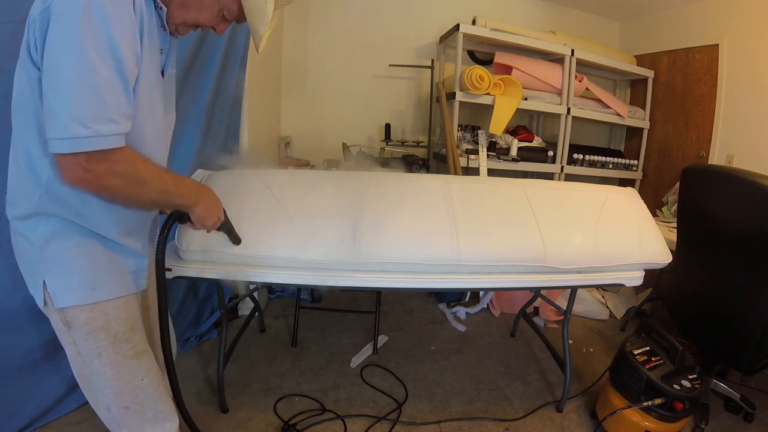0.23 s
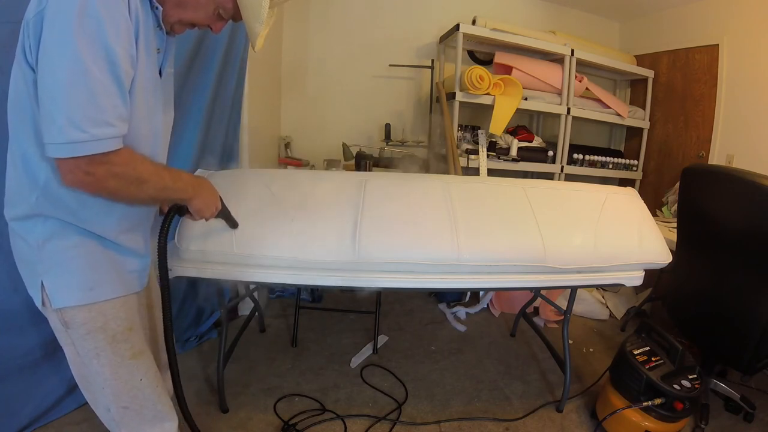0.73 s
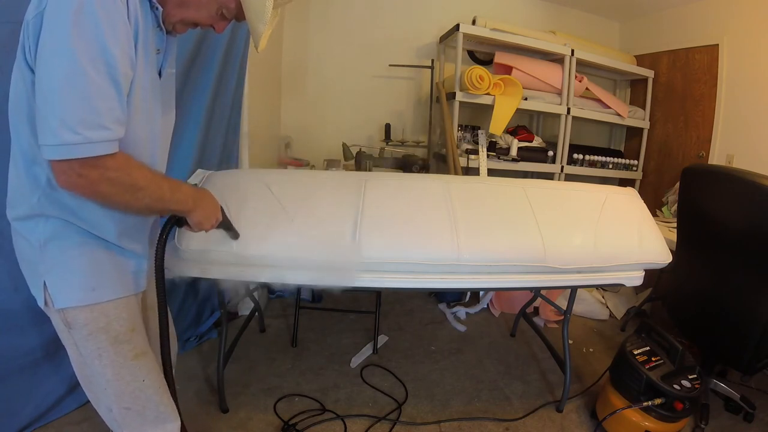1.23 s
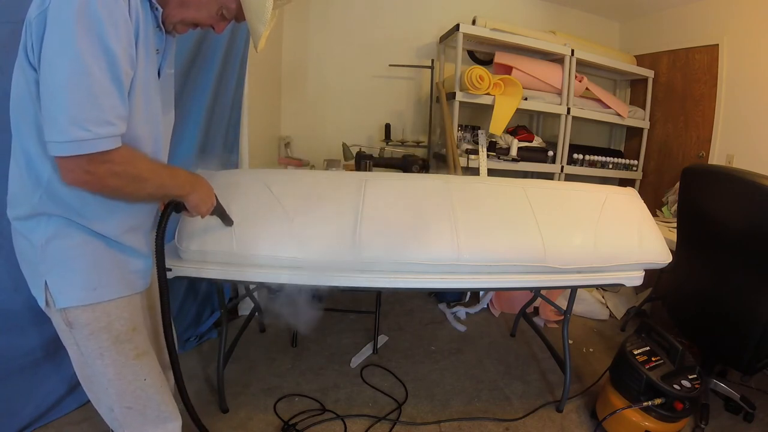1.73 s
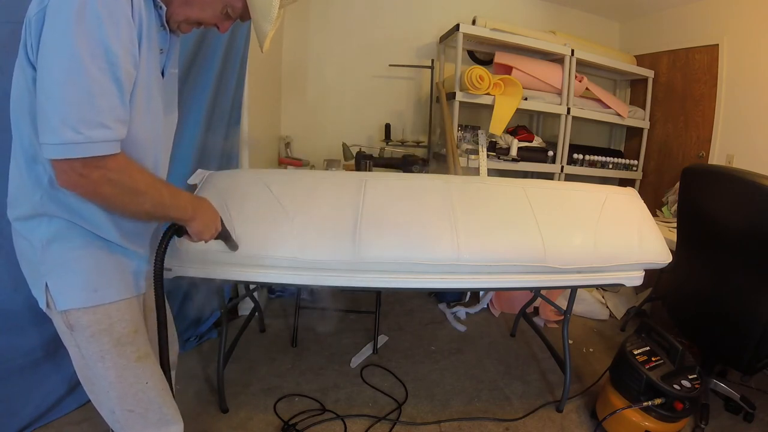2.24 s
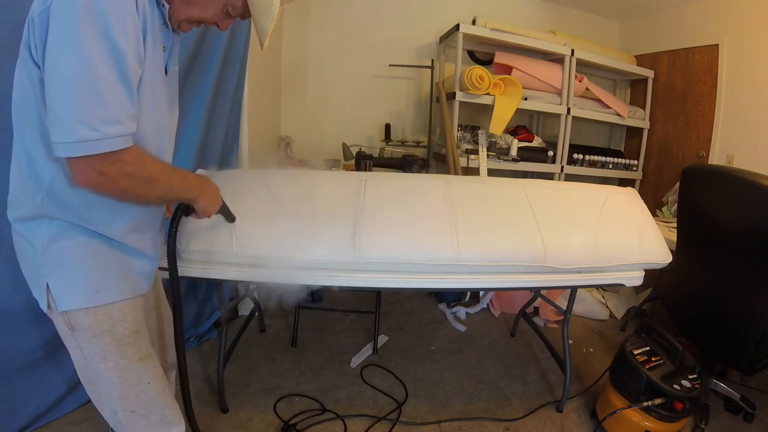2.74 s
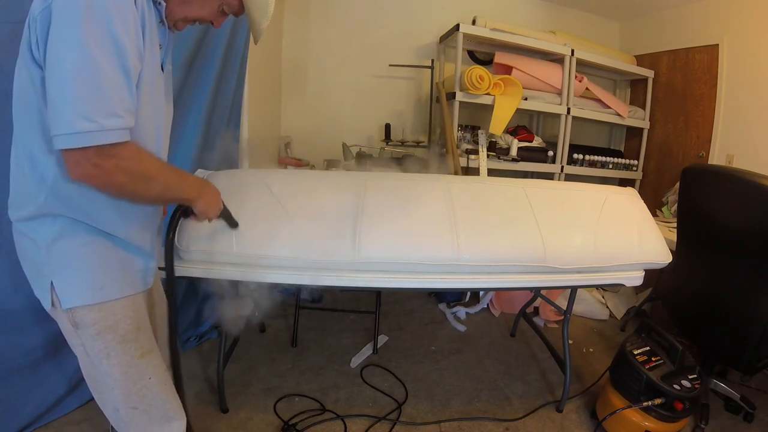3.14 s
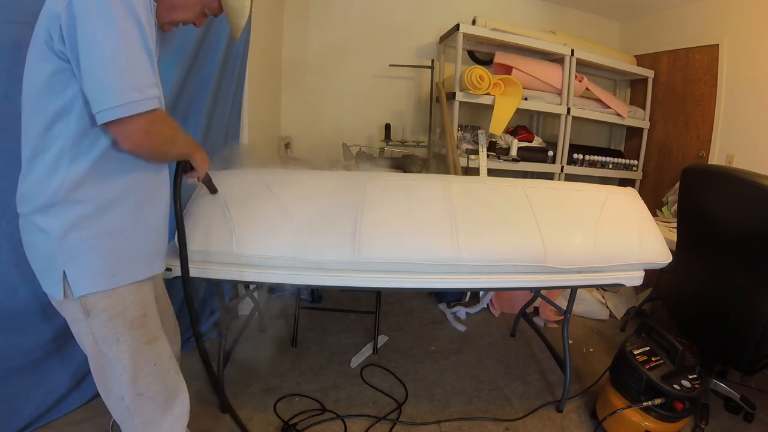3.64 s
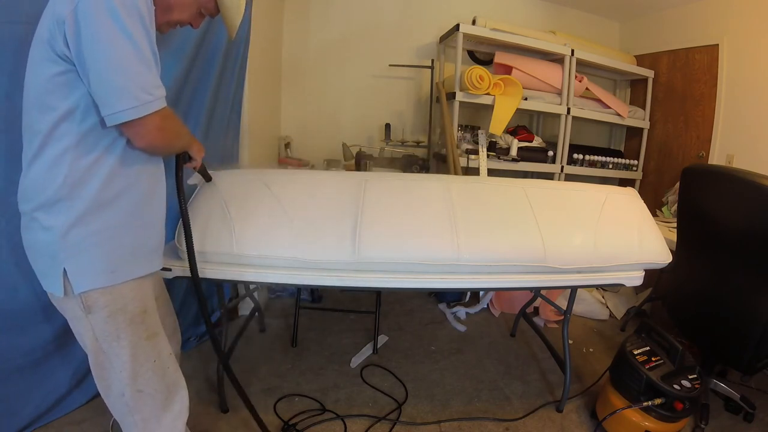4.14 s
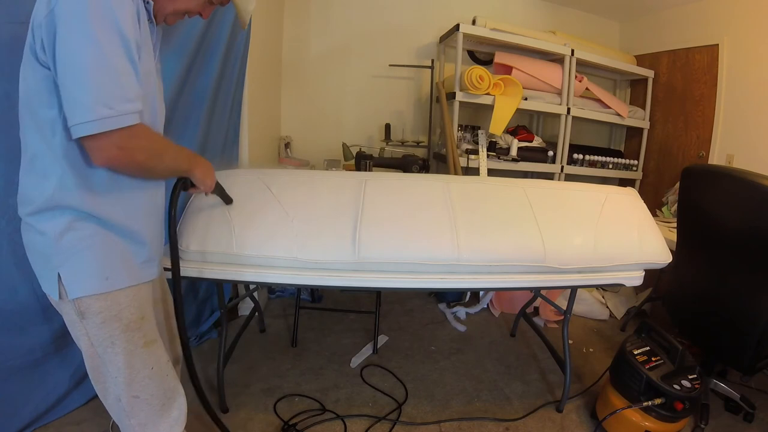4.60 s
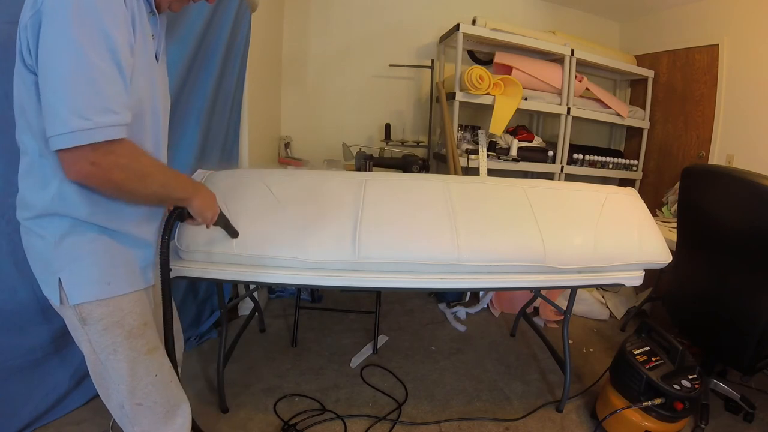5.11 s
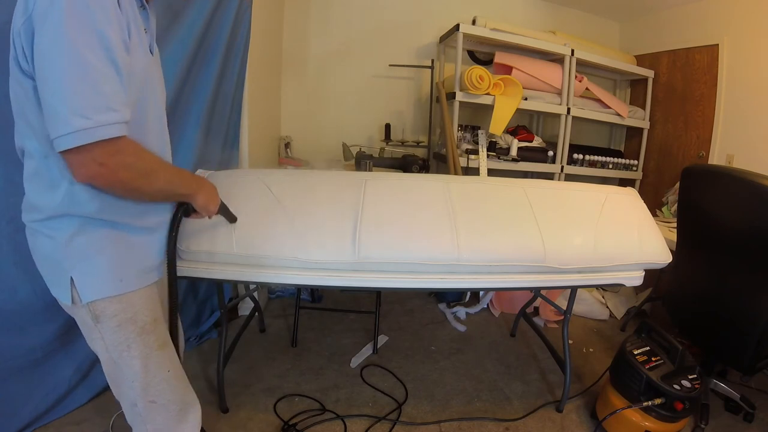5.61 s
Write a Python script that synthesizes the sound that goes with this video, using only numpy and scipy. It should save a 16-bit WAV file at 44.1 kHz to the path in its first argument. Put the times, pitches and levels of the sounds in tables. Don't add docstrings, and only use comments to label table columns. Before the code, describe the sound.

A handheld steamer runs throughout, heard from a few steps away by a camera microphone in a small workshop with close walls and a short tail. The wet hiss has a noisy, slightly whistling ring wavering around 3 kHz, dry fizz from about 4 to 9 kHz and thinner mist above. From 0 to 4 seconds it is strong and agitated: puffs and soft, hollow slaps on taut vinyl around 1 kHz come several times a second, with rushing along seams and tiny droplet spits. Condensate makes it choke briefly, notably near 0.3, 0.7, 1.0 and, deepest, 2.05 to 2.25 seconds. A misty, wet spray swells around 3.8, then the jet drops markedly near 4.15. It gradually recovers, steadier and somewhat weaker, with renewed puffs after 5 seconds and misty spray near 5.8, still hissing at the end. Low room rumble, a faint wavering motor hum near 85 Hz and slight microphone hiss remain underneath.

```python
import sys
import numpy as np
from scipy import signal
from scipy.io import wavfile
from scipy.ndimage import uniform_filter1d

SR = 44100
rng = np.random.default_rng(int(sys.argv[2]) if len(sys.argv) > 2 else 0)


def gain_from_decibels(decibels):
    exponent = np.asarray(decibels, float) / 20
    return 10 ** exponent


def transcribe(signal):
    frames = np.atleast_2d(signal).T
    limited = np.clip(frames, -1, 1)
    pcm = np.round(limited * 32767).astype(np.int16)
    wavfile.write(sys.argv[1], SR, pcm)


N = 258558

# f/Hz, density level/dB
RUMBLE_SPECTRUM = [(10, -15), (20, 7.5), (27, -3), (34, -1), (60, -5.5), (110, -11.5), (200, -12.5),
                   (400, -17), (800, -17.5), (1600, -22), (3000, -21.5)]
# f/Hz, density level/dB
CAPSULE_SPECTRUM = [(1500, -19), (4000, -4), (7300, -3), (8200, -5), (8800, -5), (12000, 6), (13400, 4),
                    (15300, 2)]
# t/s, level/dB, rise/s, fade/s
HUM_SWELLS = [(.03, 13, .05, 0.071), (.45, 13, .12, 0.079), (1.12, 11, 0.16, .08), (1.4, 4, .04, 0.036),
              (1.75, 5.5, 0.11, .05), (2.07, 12, .08, .07), (2.42, 8, .08, .04), (2.76, 12, .07, 0.12),
              (3.4, 13.5, .2, 0.17), (3.83, 11.5, .12, 0.22), (4.7, 10, 0.2, .35), (5.37, 10, .04, .04),
              (5.62, 7, .08, .3)]
# delay t/s, level/dB
WALL_ECHOES = [
    (.0009, -40),
    (.0023, -26),
    (.0041, -33.5),
    (.0078, -12.5),
    (.0095, -13.5),
]
# f/Hz, density level/dB
WASH_SPECTRUM = [(150, -7.5), (300, -6), (480, -4), (600, 0.5), (700, -3.5), (860, 1.5), (1100, -0.5),
                 (1400, -5.5), (1700, -31.5), (2200, -18)]
# f/Hz, density level/dB
RUSH_SPECTRUM = [(900, -57), (1250, -6), (1500, 0.5), (1800, 1), (2100, 1.5), (2400, 5), (2900, -18)]
# t/s, level/dB, fade/s
VINYL_SLAPS = [(0.138, 8.5, 0.042), (0.268, 9.5, 0.045), (0.39, 4.5, 0.053), (0.544, 6, 0.038),
               (0.72, 8.5, 0.016), (0.848, 5.5, 0.028), (0.96, 9, 0.16), (1.155, 4.5, 0.047),
               (1.41, 9, 0.045), (1.639, 6, 0.02), (1.827, 4, 0.092), (2.125, 9.5, 0.028),
               (2.387, 5, 0.052), (2.631, 9.5, 0.087), (2.777, 4.5, 0.04), (2.968, 9.5, 0.079),
               (3.201, 10, 0.034), (3.735, -2, 0.012), (4.383, 3, 0.038), (4.64, 4, 0.018),
               (5.123, 7.5, 0.053), (5.609, 6, 0.068), (5.81, 1.5, 0.069)]
# t/s, level/dB, length/s
SEAM_PASSES = [(.05, 1, 0.05), (.52, -1, 0.02), (.85, 0, .08), (1.5, 1.5, 0.034), (2.04, -9, 0.047),
               (2.25, 5.5, .04), (2.65, 3, .05), (2.93, 4, 0.026), (3.3, 1, .05), (3.56, 5.5, 0.066),
               (4.45, -4, .1), (5.0, -2, 0.091), (5.8, 3, 0.032)]
# f/Hz, density level/dB
FIZZ_SPECTRUM = [(2800, -26), (3900, -3), (4400, -2), (5000, -4), (5400, -2.5), (6000, -6), (7000, -5.5),
                 (7500, -4.5), (8400, -3), (8900, -6.5), (10000, -14.5), (12000, -37)]
# f/Hz, density level/dB
MIST_SPECTRUM = [(7000, -28.5), (10000, -2), (10400, -1), (12100, -1.5), (12600, -6.5), (13100, -7),
                 (13500, -13), (14000, -7.5), (15000, -10), (15500, -11)]
# f/Hz, level/dB
NOZZLE_RESPONSE = [(300, -10), (1900, -7.5), (2300, -1.5), (3000, -2.5), (3600, -1), (3800, 2),
                   (4300, 10.5), (9000, -30)]
# t/s, boiler pressure as ring level/dB, wetness/dB, nearness to the cushion/dB
STEAM_SUPPLY = [(0.0, -29.5, 3.5, 0.8), (0.5, -27.5, -1.9, -4), (1.0, -32.0, 3.5, -2.3), (1.4, -32.5, 2, 2),
                (1.8, -29.5, -2, -0.1), (2.2, -34, 0.2, 2.2), (2.7, -32, -0.5, -4), (3.3, -29.5, 2.5, 1.5),
                (3.8, -30.5, -7.5, 1), (4.15, -39.5, 1.5, -3.5), (4.4, -36.5, -1.2, 1.2),
                (4.7, -35, -2.5, 0.5), (4.95, -34.5, -2, 5), (5.2, -32, 2, 0), (5.5, -32.5, -1, -2.5),
                (5.86, -32.5, -0.9, 0.2)]
# t/s, depth/dB, closing/s, clearing/s
HOSE_CHOKES = [(0.321, 11.5, 0.063, 0.048), (0.675, 11, 0.081, 0.026), (1.013, 11, 0.035, 0.05),
               (1.163, 7.5, 0.041, 0.065), (1.35, 5, 0.032, 0.031), (1.599, 3, 0.016, 0.055),
               (2.05, 15.5, 0.077, 0.079), (2.243, 12, 0.032, 0.063), (2.55, 1.5, 0.016, 0.014),
               (3.045, 8.5, 0.018, 0.027), (3.159, 7, 0.1, 0.018), (3.519, 2.5, 0.081, 0.013),
               (3.9, 1.7, 0.099, 0.012), (5.23, 3, 0.022, 0.02), (5.463, 5.4, 0.13, 0.021),
               (5.689, 5, 0.082, 0.023)]
# t/s, level/dB, fade/s
DRY_PUFFS = [(-0.001, 5.5, 0.017), (0.078, 6, 0.053), (0.378, 3.5, 0.018), (0.558, 1.5, 0.049),
             (0.727, 9, 0.023), (0.821, 6, 0.046), (1.09, 7.5, 0.12), (1.318, 4.5, 0.08), (1.535, 5, 0.049),
             (1.638, 4, 0.032), (1.872, 4, 0.037), (2.13, 6.5, 0.04), (2.42, 4, 0.14), (2.696, 6, 0.056),
             (2.882, 3.5, 0.044), (3.084, 6, 0.031), (3.265, 5, 0.025), (3.351, 3.5, 0.042),
             (3.616, -1.5, 0.012), (3.969, 2.5, 0.034), (4.36, 4, 0.041), (4.585, 5, 0.0083),
             (4.672, 4.5, 0.019), (4.82, 3.9, 0.112), (4.941, 3.5, 0.015), (5.061, 7.5, 0.075),
             (5.236, 6.5, 0.034), (5.607, 8, 0.058), (5.73, 5, 0.042), (5.808, 5.5, 0.046)]
# t/s, level/dB, fade/s
WET_SPRAYS = [(0.17, 2, 0.051), (0.26, 3, 0.025), (0.463, 4, 0.014), (0.561, 3.3, 0.032),
              (0.86, 4.5, 0.029), (0.98, 3.5, 0.03), (1.092, 1.5, 0.014), (1.422, 3, 0.061),
              (1.513, 5.5, 0.027), (1.928, 3, 0.043), (2.03, 5.5, 0.046), (2.14, 3.6, 0.021),
              (2.43, 3.5, 0.13), (2.682, 6, 0.057), (2.959, 3, 0.055), (3.263, 3, 0.027), (3.413, 2, 0.029),
              (3.66, 4.5, 0.059), (3.8, 8.1, 0.079), (4.009, 4, 0.057), (5.078, 5, 0.044),
              (5.254, 2.6, 0.014), (5.795, 4.5, 0.12)]
# t/s, ring f/Hz
RING_PITCH = [(0.0, 3150), (0.13, 3100), (0.23, 3240), (0.85, 3110), (0.96, 3300), (1.01, 3260),
              (1.86, 3090), (1.89, 3220), (3.39, 3170), (3.46, 2880), (3.57, 3150), (3.88, 3100),
              (4.03, 3320), (4.55, 3200), (4.91, 3000), (5.43, 3340), (5.56, 3040), (5.86, 3110)]
# t/s, difference level/dB, from f/Hz, to f/Hz
CHANNEL_SPLITS = [(.43, -16, 2970, 9600), (1.611, -15, 100, 15000), (1.78, -19, 100, 15000),
                  (2.1, -13, 100, 15000), (2.23, -18, 5000, 14500), (2.79, -19, 100, 2300),
                  (2.96, -22, 100, 15000), (3.1, -19, 3200, 8300), (3.45, -17, 100, 15000),
                  (3.54, -6, 12400, 13800), (3.79, -17, 100, 15000), (3.96, -14, 100, 14500),
                  (4.12, -16, 100, 15000), (4.29, -17, 100, 15000), (4.96, -13, 10100, 12300),
                  (5.12, -1, 8300, 9800), (5.22, -4, 7000, 8500), (5.45, -17, 100, 15000),
                  (5.52, -17, 100, 14500), (5.61, -20, 100, 15000), (5.68, -13, 100, 15000)]

USUAL_DB = -30
PUFF_RISE, SPRAY_RISE, SLAP_RISE = 0.66, 0.75, 0.74
FIZZ_DB, FIZZ_FOLLOWS = -33, 0.87
MIST_DB, MIST_FOLLOWS, MIST_PER_WET = -42, 0.89, 1.75
BEAT_DB, BEAT_FOLLOWS = -40.5, 0.75
RUSH_DB, RUSH_FOLLOWS, RUSH_PER_SLAP, RUSH_PER_PUFF = -42.5, 0.75, 0.73, 0.49
LIP_PER_SEAM = 0.66
HOLLOW_HZ, SAG_HZ_PER_DB = 990, 6


def evened(x):
    return x / np.sqrt(np.mean(x ** 2) + 1e-20)


def columns(rows):
    s, *values = np.transpose(rows)
    return [np.interp(np.arange(N) / SR, s, v) for v in values]


def swells(rows, rise=1):
    t = np.arange(0, N + 64, 64) / SR
    db = np.zeros(len(t))
    for row in rows:
        peak_s, level_db, rise_s, fade_s = row[0], row[1], rise * row[2], row[-1]
        spread_s = np.where(t < peak_s, rise_s, fade_s)
        db += level_db * np.exp(-.5 * ((t - peak_s) / spread_s) ** 2)
    return np.interp(np.arange(N) / SR, t, db)


def patchwork(shape, across_bins, across_frames):
    noise = rng.standard_normal(shape[::-1]).T
    return evened(uniform_filter1d(uniform_filter1d(noise, size=across_bins, axis=0), size=across_frames, axis=1))


def coloured(x, points, patchy_db, size=512):
    hz, t, z = signal.stft(x, SR, nperseg=size, noverlap=size * 3 // 4)
    f, db = np.transpose(points)
    shape_db = np.interp(np.log(hz + 1), np.log(f), db, left=-90, right=-90)[:, None]
    z = z * gain_from_decibels(shape_db + patchy_db * patchwork(z.shape, 6, 20))
    return evened(signal.istft(z, SR, nperseg=size, noverlap=size * 3 // 4)[1][:N])


def resonate(x, hz, width):
    turn = np.exp(2j * np.pi * np.cumsum(hz * np.ones(N)) / SR)
    r = np.exp(-np.pi * width / SR)
    once = signal.lfilter([1 - r], [1, -r], x / turn)
    twice = signal.lfilter([1 - r], [1, -r], once)
    return evened((turn * twice).real)


def room_rumble():
    return gain_from_decibels(-45.5) * coloured(rng.standard_normal(N), RUMBLE_SPECTRUM, patchy_db=1.4, size=4096)


def machine_hum():
    sway = evened(uniform_filter1d(rng.standard_normal(N), size=4000))
    hum = np.sqrt(2) * np.sin(2 * np.pi * np.cumsum(84.8 + 3.0 * sway) / SR)
    return gain_from_decibels(-60.5 + swells(HUM_SWELLS)) * hum


def microphone_hiss():
    return gain_from_decibels(-51.5) * coloured(rng.standard_normal(N), CAPSULE_SPECTRUM, patchy_db=.6)


def workshop(x, tail_db=-15, t60=.22, sweep_s=.9):
    t = np.arange(SR // 2) / SR
    early = np.zeros(1200)
    early[0] = 1
    for k, (s, db) in enumerate(WALL_ECHOES):
        early[round(s * SR)] = (-1) ** k * gain_from_decibels(db)
    out = signal.oaconvolve(x, early)[:N]
    for k in range(3):
        sparse = rng.choice([-1., 1.], len(t)) * (rng.random(len(t)) < .05)
        tail = sparse * gain_from_decibels(-60 * t / t60) * (t > .02)
        place = np.sqrt(2 / 3) * np.cos(np.pi * (np.arange(N) / SR / sweep_s - k / 3))
        out += gain_from_decibels(tail_db) * signal.fftconvolve(x * place, tail / np.linalg.norm(tail))[:N]
    return out / np.sqrt(early @ early + gain_from_decibels(tail_db) ** 2)


def steam():
    pressure_db, wet_db, near_db = columns(STEAM_SUPPLY)
    flow = pressure_db - USUAL_DB - swells(HOSE_CHOKES)
    puff = swells(DRY_PUFFS, PUFF_RISE)
    wet = wet_db + swells(WET_SPRAYS, SPRAY_RISE)
    slap = near_db + swells(VINYL_SLAPS, SLAP_RISE)
    return flow, puff, wet, slap


def droplets(per_s, spread_db):
    size = gain_from_decibels(spread_db * np.minimum(rng.exponential(1, N), 4))
    return evened(size * rng.choice([-1., 1.], N) * (rng.random(N) < per_s / SR))


def turbulence(flutter_db, spit):
    flutter = evened(uniform_filter1d(rng.standard_normal(N), size=160))
    return evened(rng.standard_normal(N) * gain_from_decibels(flutter_db * flutter) + spit)


def vinyl_cushion(spits):
    flow, puff, _, slap = steam()
    beat_db = BEAT_DB + BEAT_FOLLOWS * flow + slap
    beat_hz = HOLLOW_HZ - SAG_HZ_PER_DB * slap
    rush_db = RUSH_DB + RUSH_FOLLOWS * flow + RUSH_PER_SLAP * slap + RUSH_PER_PUFF * puff
    rush_db = rush_db + swells(SEAM_PASSES)
    drive = turbulence(flutter_db=-0.85, spit=.25 * spits)
    hollow = resonate(drive, uniform_filter1d(beat_hz, size=900), width=770)
    wash = coloured(drive, WASH_SPECTRUM, patchy_db=3.0, size=1024)
    rush = coloured(drive, RUSH_SPECTRUM, patchy_db=2.0)
    return gain_from_decibels(beat_db) * evened(0.49 * hollow + wash) + gain_from_decibels(rush_db) * rush


def free_jet(spits):
    flow, _, wet, _ = steam()
    fizz_db = FIZZ_DB + FIZZ_FOLLOWS * flow + wet
    mist_db = MIST_DB + MIST_FOLLOWS * flow + MIST_PER_WET * wet
    drive = turbulence(flutter_db=0.56, spit=.25 * spits)
    fizz = coloured(drive, FIZZ_SPECTRUM, patchy_db=1.2)
    mist = coloured(drive, MIST_SPECTRUM, patchy_db=2.0)
    return gain_from_decibels(fizz_db) * fizz + gain_from_decibels(mist_db) * mist


def nozzle_ring(spits):
    flow, puff, _, _ = steam()
    ring_hz = columns(RING_PITCH)[0]
    drive = turbulence(flutter_db=-0.1, spit=.3 * spits)
    core = resonate(drive, 1.07 * ring_hz, width=650) - resonate(drive, .93 * ring_hz, width=800)
    shoulder = resonate(drive, 0.79 * ring_hz, width=810)
    lip = 0.5 * gain_from_decibels(LIP_PER_SEAM * swells(SEAM_PASSES))
    ring = coloured(core + lip * shoulder, NOZZLE_RESPONSE, patchy_db=0.74)
    return gain_from_decibels(USUAL_DB + flow + puff) * ring


def scene():
    spits = droplets(per_s=150, spread_db=2.5)
    background = room_rumble() + machine_hum() + microphone_hiss()
    steamer = vinyl_cushion(spits) + free_jet(spits) + nozzle_ring(spits)
    mono = workshop(steamer) + background
    return np.array([mono, mono])


def thin_treble(x, from_hz=8000, full_hz=12800, margin_db=-3.0, whim_db=4.2):
    hz, t, z = signal.stft(x, SR, nperseg=2048, noverlap=1536)
    power = uniform_filter1d(uniform_filter1d(abs(z) ** 2, size=7, axis=0), size=3, axis=1) + 1e-20
    over_db = 10 * np.log10(power / uniform_filter1d(power, size=80, axis=0))
    whim = patchwork(z.shape, 13, 6)
    shortfall = 1 - np.clip((hz - from_hz) / (full_hz - from_hz), 0, 1)[:, None]
    holes = (over_db + whim_db * whim < margin_db - 14 * shortfall) & (shortfall < 1)
    return signal.istft(z * ~holes, SR, nperseg=2048, noverlap=1536)[1][:N]


def channel_difference(mono):
    delayed = np.roll(signal.lfilter([1, -.5], [1], mono), 999)
    hz, t, z = signal.stft(delayed, SR, nperseg=1024, noverlap=768)
    gate = np.zeros(z.shape)
    for s, db, lo_hz, hi_hz in CHANNEL_SPLITS:
        gate += gain_from_decibels(db) * np.outer((hz > lo_hz) & (hz < hi_hz), abs(t - s) < .008)
    return signal.istft(z * gate, SR, nperseg=1024, noverlap=768)[1][:N]


def band_limit(x):
    return signal.sosfilt(signal.butter(12, 16290, fs=SR, output="sos"), x)


def record(dry):
    limit = signal.firwin(801, 15290, window=("kaiser", 11), fs=SR)
    mono = signal.oaconvolve(thin_treble(dry[0]), limit, "same")
    apart = channel_difference(mono)
    return band_limit(np.array([mono + apart, mono - apart]))


dry = scene()
out = record(dry)
transcribe(out)
```